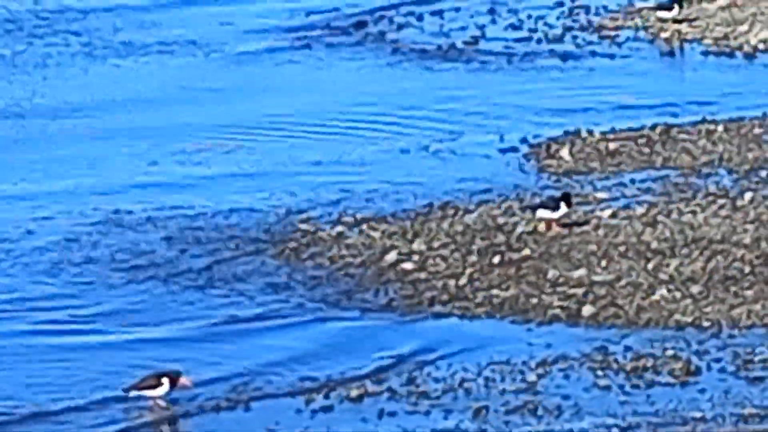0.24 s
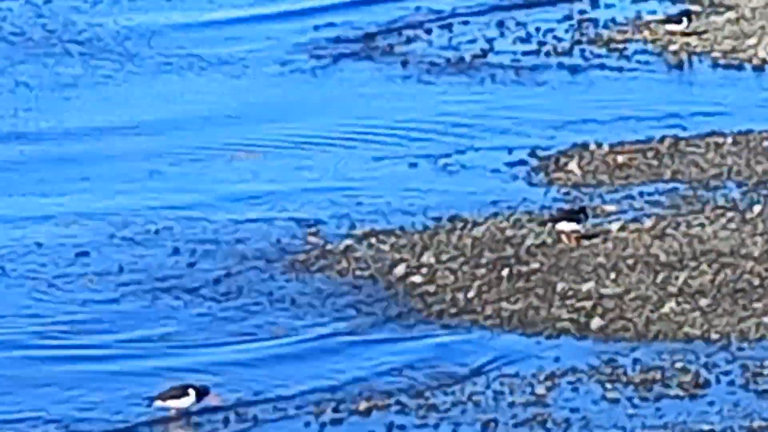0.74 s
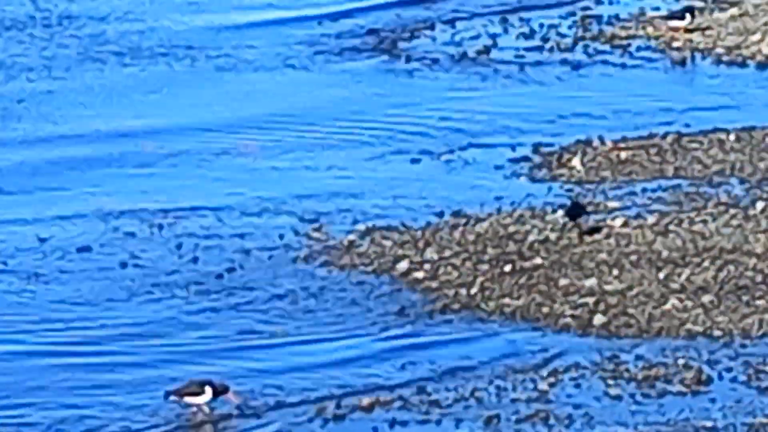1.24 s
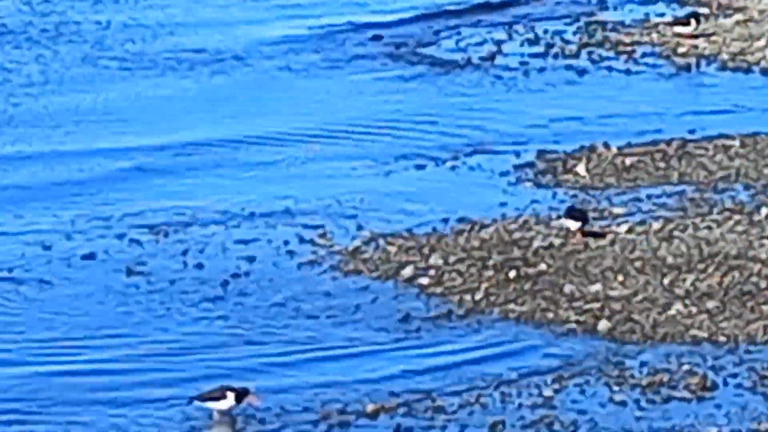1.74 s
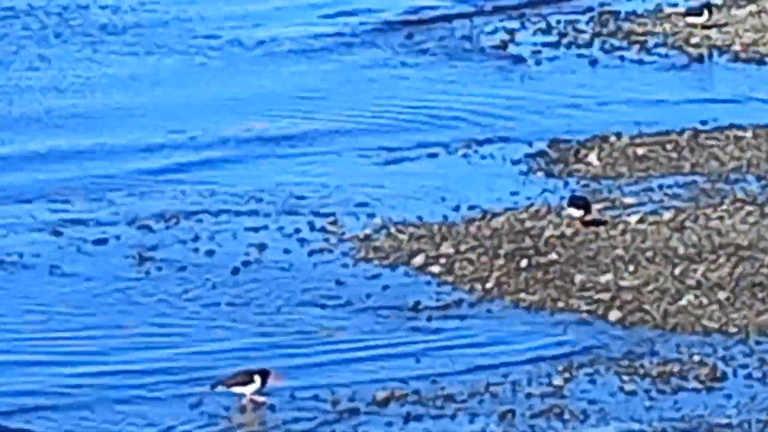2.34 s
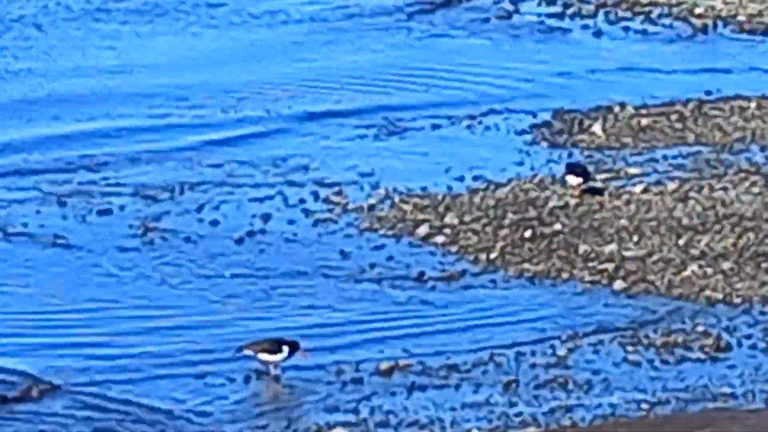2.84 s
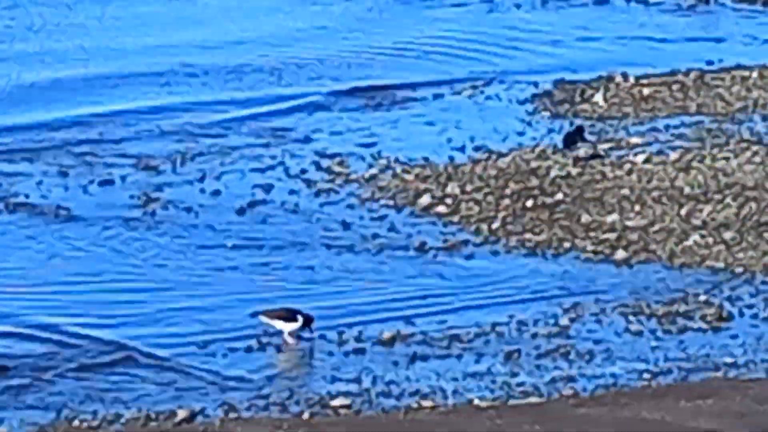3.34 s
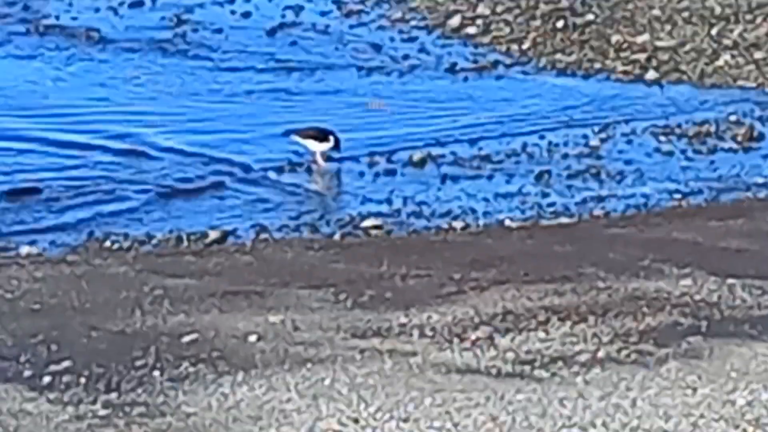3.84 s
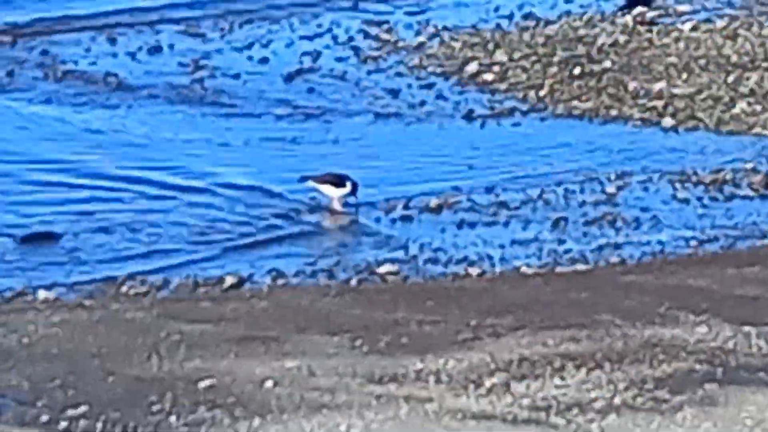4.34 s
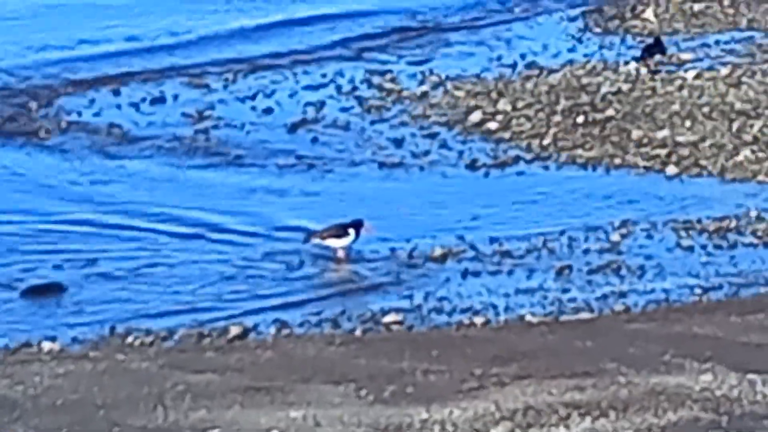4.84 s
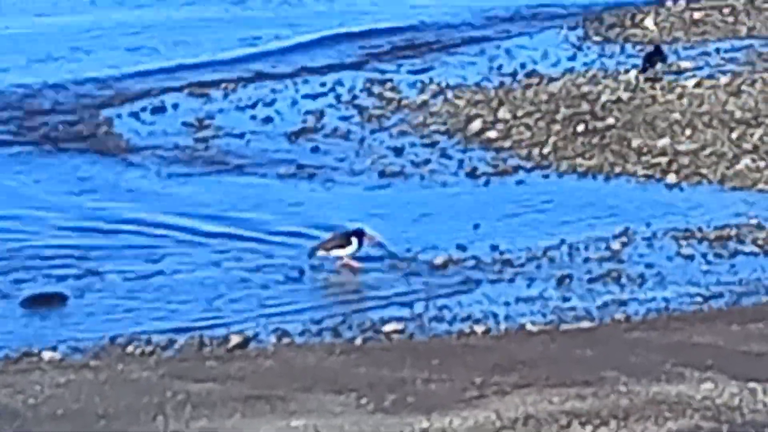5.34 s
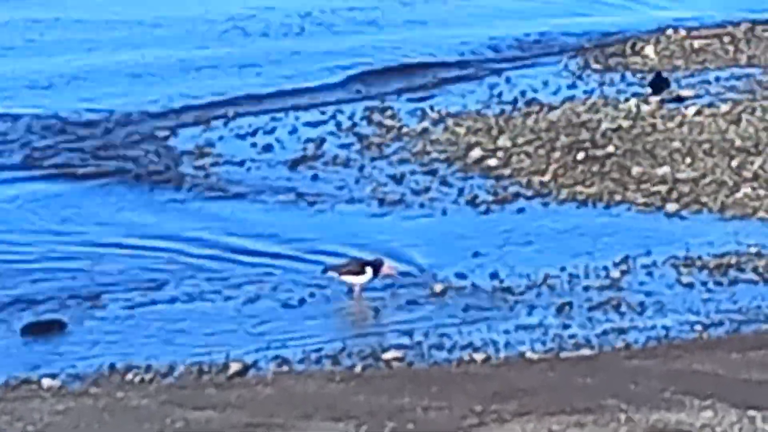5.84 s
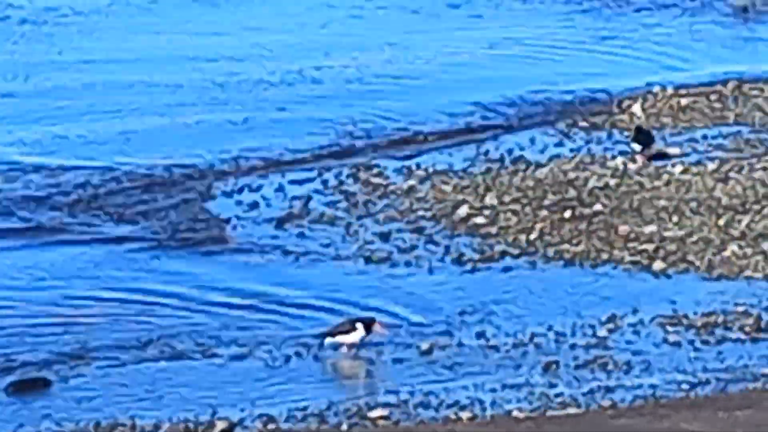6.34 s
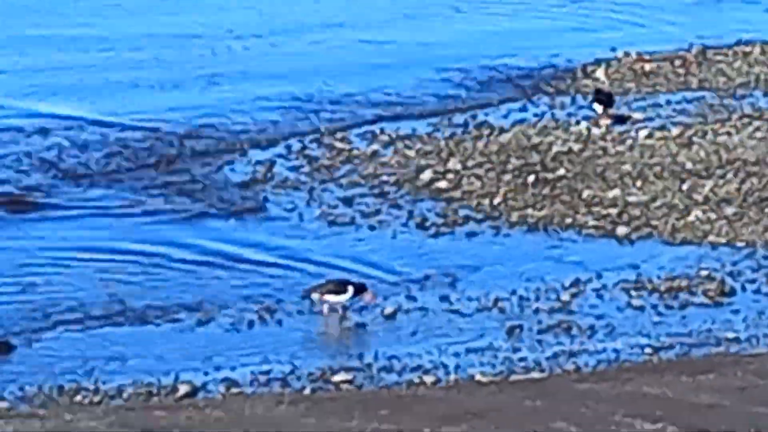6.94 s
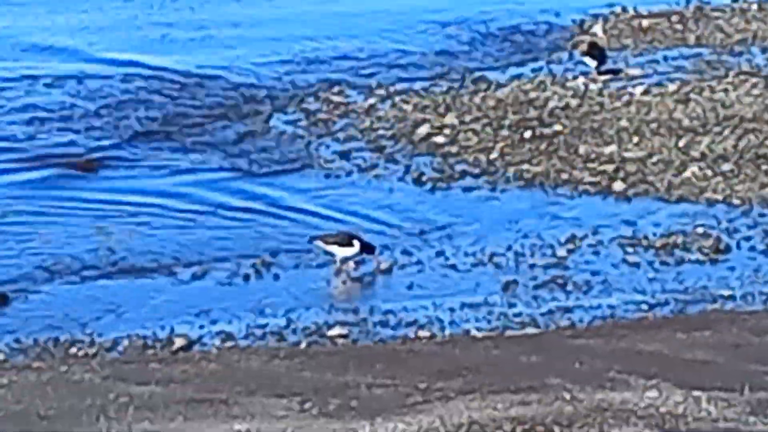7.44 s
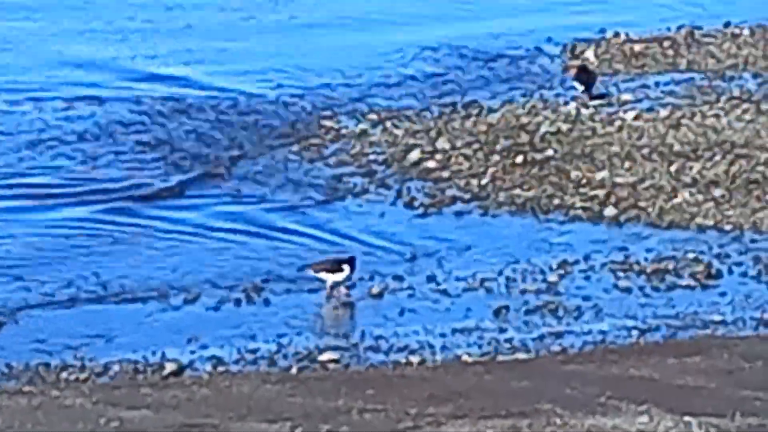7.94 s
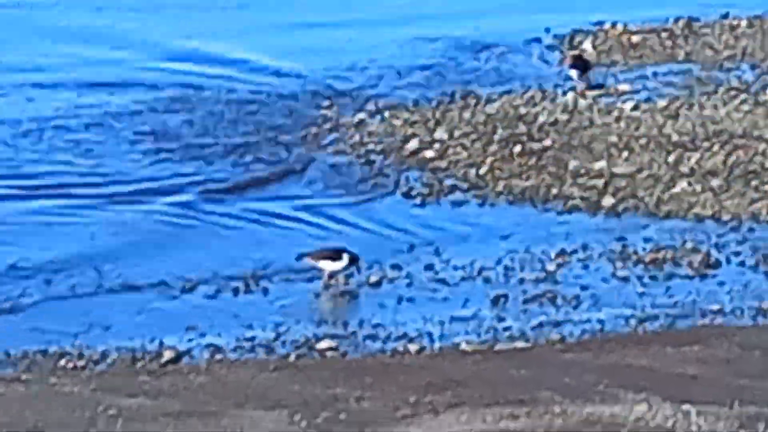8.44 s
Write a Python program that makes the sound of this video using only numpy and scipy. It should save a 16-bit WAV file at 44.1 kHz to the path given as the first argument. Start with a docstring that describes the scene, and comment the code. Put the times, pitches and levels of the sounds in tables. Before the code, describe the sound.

Wavelets wash softly through shingle under a far engine's even throb, a steady hum and thin, high pips.

```python
"""Idling engine off a shingle shore

Some way off, an engine's firings excite the resonances of its exhaust pipe: a low, even throb. Valves tick and
thin high pips come and go with its strokes, beside a second machine's steady hum. Wavelets fizz through the
stones, throw spray and slap hollowly over the far roar of the shore. A low rumble swells midway and thumps
once, eddies of a breeze bump the left microphone, and a faint hiss lies behind."""
import sys
import numpy as np
from scipy import signal
from scipy.fft import rfft, irfft, next_fast_len
from scipy.io import wavfile
from scipy.ndimage import map_coordinates

SR = 44100
rng = np.random.default_rng(int(sys.argv[2]) if len(sys.argv) > 2 else 0)


def put_to_file(sound):
    """Save the sound as 16-bit audio at rate SR, in the file named by the first command-line argument."""
    columns = np.atleast_2d(sound).T  # one column per channel
    safe = np.clip(columns, -1, 1)
    whole_steps = np.round(safe * 32767)
    wavfile.write(sys.argv[1], SR, whole_steps.astype(np.int16))


N = 383229
TIME, HZ = np.arange(N) / SR, np.fft.rfftfreq(N, 1 / SR)
PIP_REACH_S = .02  # a pip extends this far either side of its middle

# engine speed: (time [s], firing rate [Hz])
FIRING_RATE = [(0.0, 22.04), (0.9, 21.99), (1.4, 21.75), (2.0, 21.92), (2.5, 22.09), (3.6, 21.97),
               (4.3, 21.91), (5.0, 21.98), (5.5, 22.03), (6.7, 22.01), (7.3, 21.89), (8.6, 22.08)]
# response of the exhaust pipe: (multiple of the firing rate [1], relative level [dB])
PIPE_RESPONSE = [(1, -54), (2, -18), (3, -5.5), (4, -9.5), (5, -5.5), (6, -9.5), (7, 2), (8, -1.5),
                 (9, -16), (10, -31), (13, -22), (14, -17), (15, -31.5), (16, -17.5), (18, -26.5),
                 (20, -27.5)]
# valve knocks: (place [strokes], half-length [strokes], centre [Hz], bandwidth [Hz], level [dB])
VALVE_KNOCKS = [(.16, 0.09, 5620, 6000, -70), (.81, 0.053, 6000, 6000, -70.5),
                (.84, 0.093, 3230, 700, -74.5)]
# a pip's note, then its overtones: (frequency [Hz], relative level [dB], lead [s], noise share [0-1])
PIP_PARTIALS = [(3740, 1.7, 0, .48), (5570, -5, .005, .65), (7550, -2.5, .002, .5), (11130, -13, .003, .6)]
# the clearest pips: (time [s], note gain [dB], overtone gain [dB])
CLEAR_PIPS = [(.106, -67.5, -73), (.203, -64.5, -66.5), (.243, -67.5, -72), (.383, -63.5, -65.5),
              (.79, -66, -72), (.835, -68, -67), (.973, -68, -71), (1.156, -67, -70), (1.34, -67, -67.5),
              (1.662, -65, -67.5), (1.755, -67.5, -67.5), (2.025, -67.5, -68.5), (2.39, -65, -71),
              (2.752, -66, -72), (2.799, -68.5, -70), (2.844, -66.5, -73), (2.983, -66.5, -72),
              (3.39, -65, -72), (3.479, -66, -67.5), (3.571, -65, -72), (3.665, -66.5, -70),
              (3.841, -64.5, -72), (4.301, -62.5, -66), (5.213, -65, -72), (5.392, -66, -68.5),
              (6.027, -73, -66.5), (7.485, -67, -73), (7.526, -71, -67.5), (7.71, -72, -66),
              (7.758, -63.5, -68.5), (7.893, -70, -68), (8.397, -65.3, -72), (8.488, -65.5, -72)]
# usual strength of the faint pips: (time [s], gain [dB])
FAINT_PIP_GAIN = [(0, -74), (4.3, -74), (5.7, -76.5), (7.3, -73.5)]
# steady machine whines: (frequency [Hz], right level [dB])
WHINE_TONES = [(950, -68.5), (3735, -86), (6275, -85), (8450, -87)]
# wavelets running up the shingle: (start [s], length [s], wash gain [dB], spray relative to wash [dB])
WAVELET_RUNS = [(.1, 0.65, -7, 2), (1.777, 0.33, -2, -9), (1.97, 0.43, -3, -3), (2.8, 0.85, 0.5, 1),
                (3.125, .24, 1, -14), (3.58, 0.5, -2.5, 6.5), (4.02, 1, -3.5, -6), (4.95, 0.7, -3.5, 1),
                (6.5, 0.73, -5, -3), (7.15, 0.5, -6, 2), (8.3, .45, -6.5, 0)]
# water running between stones: (frequency [Hz], left density [dB/Hz], right density [dB/Hz])
FIZZ_SPECTRUM = [(200, -140, -140), (1000, -106, -104), (1570, -102, -106), (2050, -92, -112),
                 (2480, -98, -112), (2800, -102, -110), (3420, -112, -112), (4620, -110, -113),
                 (5800, -121, -119), (9000, -130, -130), (14000, -140, -140)]
# fine spray of a breaking wavelet: (frequency [Hz], left density [dB/Hz], right density [dB/Hz])
SPRAY_SPECTRUM = [(1800, -120, -122), (2700, -105, -111), (3420, -110, -109), (4600, -102.5, -107),
                  (5300, -108, -104.5), (6200, -115, -113), (9000, -125, -124), (14000, -138, -138)]
# soft hollow notes, slaps of water on the stones and one thump of the low rumble: (start [s], length [s], level
# [dB], pitch [Hz])
HOLLOW_NOTES = [(0.249, .14, -55.5, 1100), (0.424, 0.13, -57, 1050), (2.409, 0.38, -53.5, 607),
                (4.277, .08, -43.5, 417)]
# ticking drips and pebbles: (time [s], level [dB], pitch [Hz])
PEBBLE_TICKS = [(.302, -64, 8050), (1.803, -61, 2000), (2.086, -63, 2950), (2.158, -62, 2790),
                (2.262, -64, 4600), (7.331, -60, 7900)]
# far roar of the shore: (frequency [Hz], density [dB/Hz])
ROAR_SPECTRUM = [(28, -100), (38, -93), (62, -75), (150, -66), (215, -72.5), (300, -71.5), (400, -76),
                 (520, -79), (760, -81.5), (960, -84), (1200, -90), (1450, -91.5), (2000, -104),
                 (4000, -122), (12000, -145)]
# low rumble: (frequency [Hz], density [dB/Hz])
RUMBLE_SPECTRUM = [(100, -76), (200, -60), (290, -59.5), (400, -65), (520, -75.5), (900, -105),
                   (3000, -140)]
# swells of the rumble: (middle [s], length [s], gain [dB])
RUMBLE_SWELLS = [(3.72, 0.62, -5), (4.103, 0.2, -6.5), (4.368, 0.4, -3.5), (4.952, 0.55, -5.5),
                 (6.83, 0.58, -9)]
# wind pressure on a microphone: (frequency [Hz], density [dB/Hz])
BUFFET_SPECTRUM = [(30, -79), (45, -69), (62, -51), (88, -50), (120, -55), (180, -62), (300, -76),
                   (600, -100), (2000, -150)]
# eddies of the breeze: (start [s], length [s], gain [dB])
EDDIES = [(.08, 0.47, -12.5), (1.12, 0.15, 4), (1.237, 0.17, 3.5), (1.711, 0.13, -4.5), (2.347, .22, -9.5),
          (4.28, 0.18, -5)]
# high hiss: (frequency [Hz], left density [dB/Hz], right density [dB/Hz])
HISS_SPECTRUM = [(200, -135, -135), (710, -118, -123), (1570, -103, -118), (2720, -108.5, -117),
                 (3230, -102.5, -103), (3700, -102.5, -101.5), (4480, -107, -105.5), (5400, -105.5, -103),
                 (6100, -107, -104.5), (7040, -108.5, -109.5), (7550, -109, -107), (8350, -107, -105),
                 (9100, -112.5, -113.5), (9900, -113.5, -112.5), (9800, -119.5, -112.5),
                 (11500, -119.5, -110.5), (12300, -119.5, -117), (15300, -114.5, -117.5)]
# late colouring of the hiss on the right: (frequency [Hz], gain [dB])
HOLLOW_COLOUR = [(2000, -7), (2900, -8), (3700, -3.5), (4600, 3.5), (5500, -9), (6300, 5), (6900, 3),
                 (7600, 1.5), (8500, -1.5), (9700, 3.5), (10700, -2), (11500, -2), (12500, 1)]


def exhaust(strokes, level_db=-39.5, uneven_db=.74, rolloff_db_per_octave=9, size=16384):
    """Source and filter: each firing is an impulse that sets the pipe's damped resonances ringing."""
    fired = np.diff(np.floor(strokes), prepend=np.floor(strokes[0]))
    pulses = fired * amp(uneven_db * rng.standard_normal(N))
    mean_rate, hz = np.mean(FIRING_RATE, 0)[1], np.fft.rfftfreq(size, 1 / SR)
    harmonics = [(k * mean_rate, db) for k, db in PIPE_RESPONSE]
    octaves_above = np.log2(np.maximum(hz / harmonics[-1][0], 1))
    db = colour(harmonics, hz) - rolloff_db_per_octave * octaves_above - hz / 100
    log_gain = np.log(amp(np.maximum(np.r_[db, db[-2:0:-1]], -100)))
    minimum_phase = np.exp(np.conj(signal.hilbert(log_gain)))  # the ring follows its impulse
    thud = np.fft.ifft(minimum_phase).real[:size // 2]
    throb = disperse(signal.oaconvolve(pulses, thud)[:N])
    return from_afar(amp(level_db) * unit(throb), left_db=2)


def disperse(x, from_hz=230, s_per_hz=.00011):
    """Dispersion: group delay grows with frequency above the bass, softening each thud's edge."""
    delay_s = s_per_hz * np.clip(HZ - from_hz, 0, 2 * from_hz)
    phase = 2 * np.pi * np.cumsum(delay_s) * SR / N
    return irfft(rfft(x) * np.exp(-1j * phase), N)


def valves(strokes, left_db=-3):
    """Impact noise: valves tick twice a stroke, and the later tick also rings in a narrow band."""
    out = np.zeros((2, N))
    for place, half_length, hz, width_hz, db in VALVE_KNOCKS:
        offset = (strokes - place + .5) % 1 - .5
        knock = np.exp(-(offset / half_length) ** 2)
        out += amp(db) * knock * noise_band((2, N), hz, width_hz)
    return out * amp([[left_db], [0]])


def pips(strokes, place=.29, uneven_db=2.3, apart_s=.025):
    """Phase locking: between the clear pips, faint ones recur at one point of each stroke."""
    out, usual_db = np.zeros((2, N)), curve(FAINT_PIP_GAIN)
    for s, note_db, overtones_db in CLEAR_PIPS:
        add(out, s - PIP_REACH_S, pip(note_db, overtones_db))
    for i in np.flatnonzero(np.diff(np.floor(strokes - place))):
        if min(abs(i / SR - row[0]) for row in CLEAR_PIPS) > apart_s:
            note_db, overtones_db = usual_db[i] + uneven_db * rng.standard_normal(2)
            add(out, i / SR - PIP_REACH_S, pip(note_db, overtones_db))
    return out


def pip(note_db, overtones_db, half_s=.007, detune=.009, grit_width_hz=520, left_db=-5):
    """Superposition of modes: each is a slightly mistuned tone plus grit, in a Gaussian envelope."""
    t, sound = np.arange(-PIP_REACH_S, PIP_REACH_S, 1 / SR), 0
    for k, (hz, db, lead, grit) in enumerate(PIP_PARTIALS):
        pitch = hz * (1 + detune * rng.standard_normal())
        tone = np.sin(2 * np.pi * (pitch * t + rng.random((2, 1))))
        rasp = noise_band((2, len(t)), hz, grit_width_hz)
        swell = amp(db + (overtones_db if k else note_db)) * np.exp(-((t + lead) / half_s) ** 2)
        sound = sound + swell * unit((1 - grit) * unit(tone) + grit * rasp)
    return sound * amp([[left_db], [0]])


def hum(hz=250, level_db=-49.2, waver_hz=.591, waver_db=.9):
    """Slow modulation: a second machine's pure tone wavers slightly in frequency and amplitude."""
    phase = 2 * np.pi * np.cumsum(hz + waver_hz * drift(3)) / SR
    peak = amp(level_db + waver_db * drift(4.6)) * np.sqrt(2)
    return from_afar(peak * np.sin(phase), left_db=-2)


def whines(width_hz=45):
    """Narrow-band noise is heard as fuzzy machine tones; the high ones lie mostly on the right."""
    tones = np.zeros((2, N))
    for hz, db in WHINE_TONES:
        shadow_db = np.interp(hz, [1000, 3500], [0, -7])
        tones += amp([[db + shadow_db], [db]]) * noise_band((2, N), hz, width_hz)
    return tones


def shingle(trickle_db=-13, slosh_db=3, crest=.39, steepness=.43):
    """Incoherent sources add in power: wavelets build on a trickle of fizz, and each throws spray."""
    wash, splash = np.full(N, amp(trickle_db)), np.zeros(N)
    for start, length, db, spray_db in WAVELET_RUNS:
        run = amp(db) * triangle(start, length, crest) ** steepness
        wash = np.hypot(wash, run)
        splash += amp(spray_db) * run
    fizz = noise_pair(FIZZ_SPECTRUM) * amp(1.5 * np.tanh(drift(60))) + bubbles()
    water = wash * fizz + splash * noise_pair(SPRAY_SPECTRUM)
    return water * amp(slosh_db * np.tanh(drift(22)))


def bubbles(per_s=80, sizes=16, gain_db=-67, right_db=-4):
    """Damped oscillators: small bubbles ring at random times, the higher ones dying sooner."""
    out, t = np.zeros((2, N)), np.arange(400) / SR
    for hz in np.geomspace(1800, 4600, num=sizes):
        born = rng.random(N) < per_s / sizes / SR
        strength = amp(gain_db + 3 * np.minimum(rng.exponential(1, N), 2.5))
        bubble = np.sin(2 * np.pi * hz * t) * np.exp(-hz * t / 5)
        out += signal.oaconvolve(born * strength, bubble)[:N] * rng.uniform(.92, 1, (2, 1))
    return out * amp([[0], [right_db]])


def slaps(width_hz=190):
    """Noise-driven resonance: now and then water slaps the stones, and once the rumble thumps, each with a soft
    hollow note."""
    out = np.zeros(N)
    for start, length, db, hz in HOLLOW_NOTES:
        swell = np.hanning(int(length * SR))
        add(out, start, amp(db) * swell * noise_band(len(swell), hz, width_hz))
    return from_afar(out, left_db=4.5)


def ticks(decay_s=.02, width_share=.075):
    """Exponential decay: drips and pebbles each ring briefly at their own pitch."""
    out, t = np.zeros((2, N)), np.arange(2000) / SR
    for s, db, hz in PEBBLE_TICKS:
        burst = unit(resonate(rng.standard_normal((2, len(t))), hz, width_share * hz))
        add(out, s, amp(db) * burst * np.exp(-t / decay_s))
    return out


def shore(flutter_db=1.06):
    """Amplitude-modulated noise: the far roar flutters slightly, and a low rumble swells a few times."""
    roar = diffuse_noise(ROAR_SPECTRUM, crossover_hz=1570, left_db=2.5) * amp(flutter_db * drift(25))
    swell = sum(amp(db) * np.sin(np.pi / 2 * triangle(middle - length / 2, length, crest=.46))
                for middle, length, db in RUMBLE_SWELLS)
    return roar + swell * diffuse_noise(RUMBLE_SPECTRUM, crossover_hz=3520, left_db=.5)


def breeze(lee_gain=.1):
    """Turbulent pressure: eddies bump the left microphone, while the right one lies in the lee."""
    push = np.zeros(N)
    for start, length, db in EDDIES:
        add(push, start, amp(db) * signal.windows.tukey(int(length * SR), .5))
    return push * np.array([noise(BUFFET_SPECTRUM), lee_gain * noise(BUFFET_SPECTRUM)])


def hiss(flicker_db=1.1, hollow_from_s=6.7, fade_s=.52):
    """Spectral colouring: each microphone's port shapes a high hiss; late on, the right turns hollow."""
    left, right = noise_pair(HISS_SPECTRUM)
    hollow = irfft(rfft(right) * amp(colour(HOLLOW_COLOUR, HZ)), N)
    share = np.clip((TIME - hollow_from_s) / fade_s, 0, 1)
    return np.array([left, right + share * (hollow - right)]) * amp(flicker_db * drift(40))


def from_afar(x, left_db, lag_s=.0004):
    """Path difference: a far sound reaches the left microphone later, left_db above the right."""
    delayed = np.interp(TIME - lag_s, TIME, x)
    return np.array([delayed * amp(left_db / 2), x * amp(-left_db / 2)])


def diffuse_noise(rows, crossover_hz, left_db):
    """Spatial coherence: alike at both microphones in the bass, increasingly unrelated above."""
    apart = [(f, db + 10 * np.log10(f / (f + crossover_hz))) for f, db in rows]
    alike = [(f, db + 10 * np.log10(crossover_hz / (f + crossover_hz))) for f, db in rows]
    return from_afar(noise(alike), left_db) + np.array([noise(apart), noise(apart)])


def noise_pair(rows):
    """Uncorrelated noise at the two microphones, each with its own spectrum."""
    table = np.array(rows)
    return np.array([noise(table[:, :2]), noise(table[:, ::2])])


def noise(rows):
    """Spectral shaping of white noise to rows (frequency [Hz], density [dB/Hz])."""
    size = next_fast_len(N, True)
    gain = amp(colour(rows, np.fft.rfftfreq(size, 1 / SR))) * np.sqrt(SR / 2)
    return irfft(rfft(rng.standard_normal(size)) * gain, size)[:N]


def noise_band(shape, hz, width_hz):
    """Two resonators in cascade narrow white noise to a band of rms 1."""
    return unit(resonate(resonate(rng.standard_normal(shape), hz, width_hz), hz, width_hz))


def resonate(x, hz, width_hz):
    """Second-order resonance with a peak gain of 1."""
    return signal.lfilter(*signal.iirpeak(min(hz, .45 * SR), hz / width_hz, SR), x)


def drift(per_s):
    """Smooth random fluctuation of rms 1, with about per_s new values a second."""
    knots = rng.standard_normal(4000)
    smooth = map_coordinates(knots, [TIME[::32] * per_s], order=3, mode="mirror")
    return unit(smooth).repeat(32)[:N]


def triangle(start, length, crest):
    """Linear rise and fall, reaching 1 at the share crest of its length."""
    return np.interp(TIME, [start, start + length * crest, start + length], [0, 1, 0])


def curve(rows):
    """Linear interpolation of rows (time [s], value)."""
    return np.interp(TIME, *np.transpose(rows))


def colour(rows, hz):
    """Log-frequency interpolation of rows (frequency [Hz], level [dB])."""
    f, db = np.transpose(rows)
    return np.interp(np.log(hz + 1), np.log(f), db)


def add(mix, s, sound):
    """Superposes a sound on the mix from time s."""
    part = mix[..., max(round(s * SR), 0):][..., :sound.shape[-1]]
    part += sound[..., :part.shape[-1]]


def amp(db):
    """Decibels to amplitude ratio."""
    return 10 ** (np.asarray(db) / 20)


def unit(x):
    """Normalises to rms 1."""
    return x / np.sqrt(np.mean(x ** 2) + 1e-30)


def scene(first_firing_s=.006):
    """Superposition of all sources; the integral of the firing rate times throb, valves and faint pips."""
    strokes = np.cumsum(curve(FIRING_RATE)) / SR - first_firing_s * FIRING_RATE[0][1]
    machines = exhaust(strokes) + valves(strokes) + pips(strokes) + hum() + whines()
    return machines + shore() + shingle() + slaps() + ticks() + breeze() + hiss()


def record(dry, cutoff_hz=15750, stop_s=8.625, fade_s=.005):
    """Band limiting: a low-pass filter removes the top treble; a quick fade ends the sound."""
    fade = np.clip((stop_s - TIME) / fade_s, 0, 1)
    lowpass = signal.firwin(511, cutoff_hz, window=("kaiser", 9), fs=SR)
    return signal.oaconvolve(dry * fade, lowpass[None], "same")


dry = scene()
out = record(dry)
put_to_file(out)
```